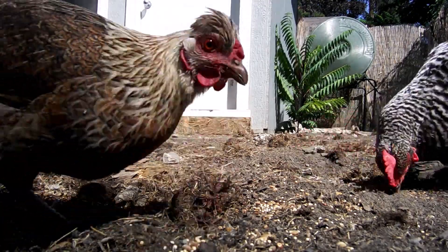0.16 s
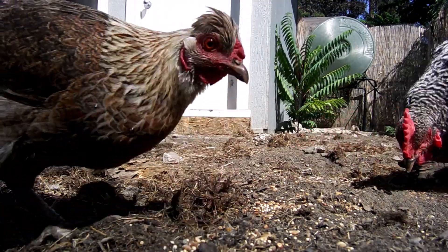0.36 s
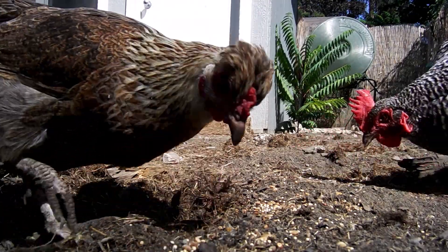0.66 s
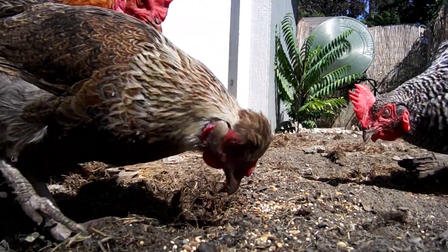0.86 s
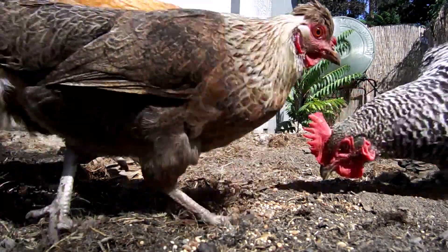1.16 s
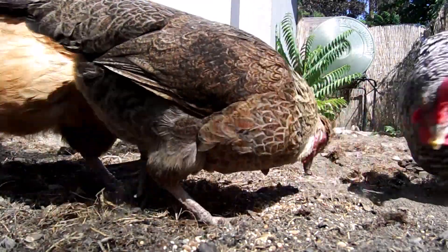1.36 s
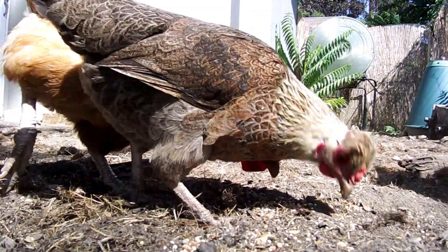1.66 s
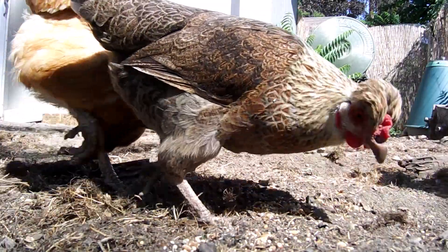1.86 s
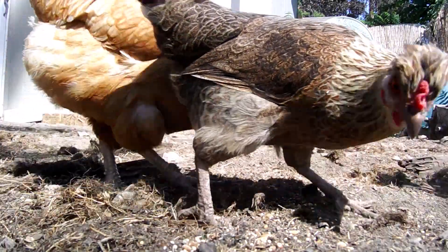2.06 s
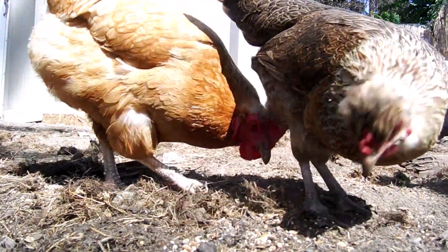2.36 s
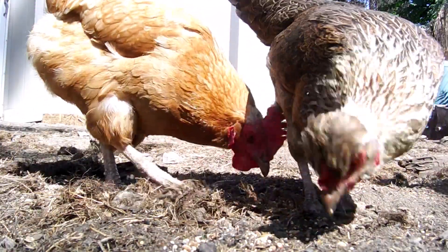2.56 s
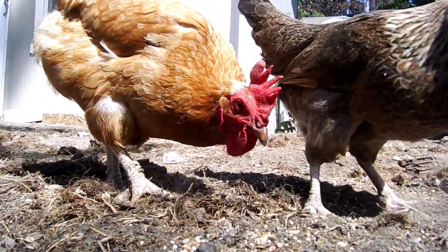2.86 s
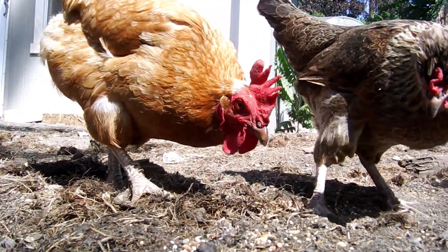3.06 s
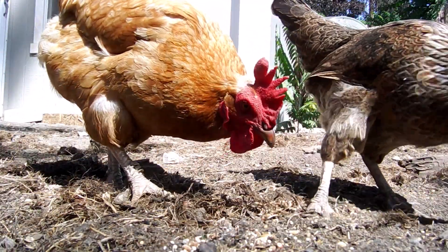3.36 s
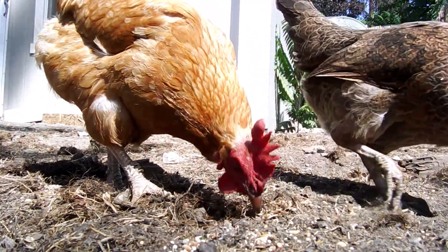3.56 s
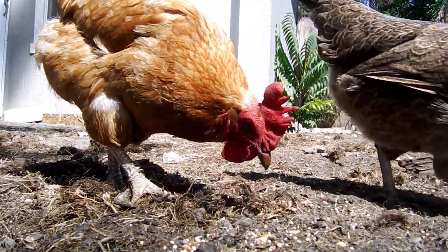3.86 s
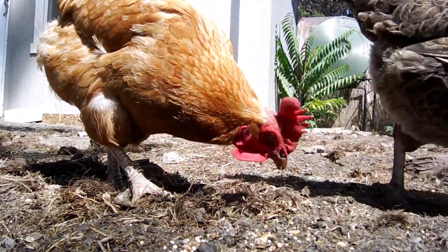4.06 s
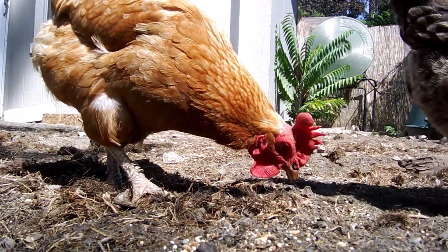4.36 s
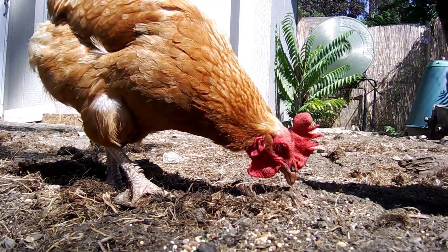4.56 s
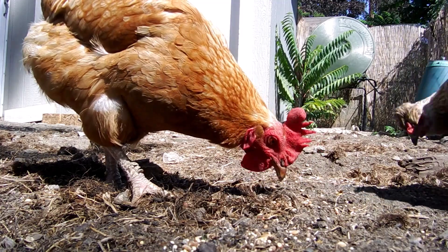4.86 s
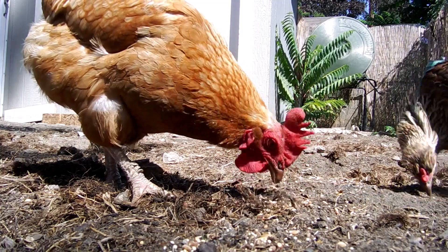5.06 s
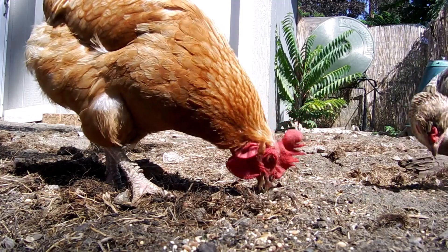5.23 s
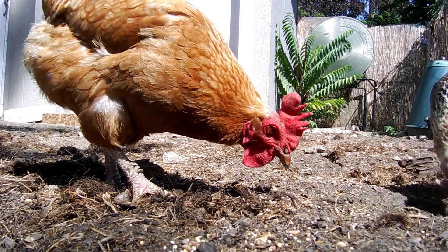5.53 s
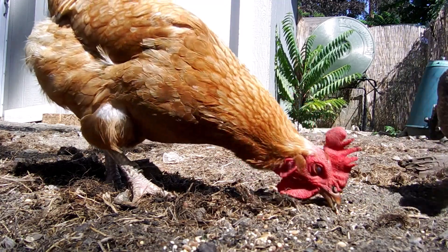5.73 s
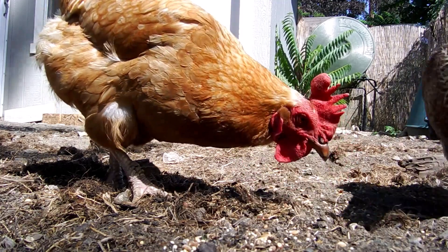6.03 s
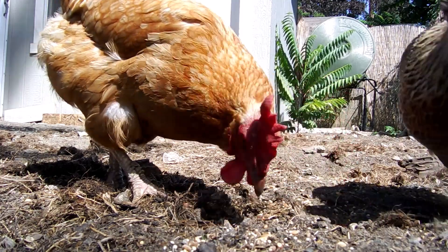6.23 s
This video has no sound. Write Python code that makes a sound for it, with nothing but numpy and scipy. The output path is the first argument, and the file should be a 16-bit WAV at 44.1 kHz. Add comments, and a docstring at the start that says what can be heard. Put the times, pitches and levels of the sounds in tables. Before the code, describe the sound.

Chickens feed very close to a microphone on bare dirt. Beaks tick and thud, feet scuff, dry litter snaps and a few seeds ping. After two seconds a hen gives short, rounded clucks and a brief raspy squawk; later another croons low in a string of breathy syllables. A small bird chirps faintly. Distant traffic, air and a weak hum lie beneath, in stereo with slight hiss.

```python
"""A hen clucks, pulses of her voice ringing the throat, and squawks in an even pulse train; another croons.
They feed on bare dirt in a small yard: beaks tap in filtered bursts, seeds ping as decaying sines,
feet scuff in clumped grains, litter snaps in bright noise; a small bird chirps gliding sines further off.
Far traffic and air (shaped noise) and a hum lie below.
Two microphone ports close by on the ground colour the sound differently."""
import sys
import numpy as np
from scipy import signal
from scipy.fft import rfft, irfft
from scipy.io import wavfile
from scipy.ndimage import uniform_filter1d

SR = 44100
rng = np.random.default_rng(int(sys.argv[2]) if len(sys.argv) > 2 else 0)


def field_ratio(decibels):
    """Amplitude ratio for a level in dB (20 dB per decade); scalars and array-likes work."""
    return 10 ** (np.asarray(decibels, dtype=float) / 20)


def wav_record(signal):
    """Record a signal, one row per channel, as 16-bit PCM in the file named by sys.argv[1]."""
    frames = np.transpose(np.atleast_2d(signal))
    bounded = np.clip(frames, -1, 1)
    # unit amplitude maps onto the largest positive 16-bit level
    quanta = np.round(bounded * 32767).astype(np.int16)
    wavfile.write(sys.argv[1], SR, quanta)


N = 281799

# Levels are source levels, ahead of placing, mixing and the port gains.
# far traffic and air: (time [s], level [dB])
TRAFFIC_LEVEL = [(0.0, -53.5), (0.25, -55.5), (0.6, -56), (1.5, -54), (2.3, -54.5), (3.5, -55.5),
                 (4.5, -55.5), (5.5, -55.5), (6.39, -55)]
# their relative spectrum: (frequency [Hz], density [dB per Hz])
TRAFFIC_SPECTRUM = [(25, -53), (60, -4), (120, 0), (300, -1.5), (900, -3), (1900, -5), (3000, -16),
                    (4500, -17.5), (6000, -26), (8000, -39), (16000, -19.5)]
# share of their power common to both ports: (frequency [Hz], share [0-1])
SHARED_POWER = [(60, 0.8), (150, 0.5), (350, 0.5), (1100, 0.51), (1600, 0.86), (2300, 0.32), (16000, 0.053)]
# wavering hum tones: (frequency [Hz], width of each of two stages [Hz], rms [dB])
HUM_TONES = [(73, 13, -80.5), (120.3, 7.2, -69), (1152.5, 45, -70.5)]
# feet and beaks stirring the dirt: (time [s], level [dB])
SCUFF_LEVEL = [(0.0, -64.5), (0.12, -79), (0.19, -59.5), (0.4, -63), (0.5, -72.5), (0.82, -63.5),
               (0.96, -74), (1.08, -65), (1.14, -54), (1.26, -58), (1.33, -55), (1.43, -63), (1.55, -59),
               (1.74, -58.5), (1.81, -66), (2.22, -61), (2.55, -65.5), (2.8, -60), (3.5, -67.5),
               (4.9, -72.5), (5.4, -64.5), (6.39, -66)]
# dry bits of litter snapping: (time [s], peak [dB])
LITTER_SNAPS = [(0.1464, -44), (0.3482, -41), (0.417, -46), (0.5807, -44.5), (0.79, -41), (0.958, -38),
                (1.105, -39), (1.5767, -34.5), (1.975, -43), (2.226, -37), (2.709, -43.5), (2.7816, -43)]
# beak on seed and dirt: (time [s], tick peak [dB], thud [Hz], thud peak [dB])
BEAK_TAPS = [(0.1888, -31.5, 1490, -40.5), (0.2166, -30.5, 1130, -39.5), (0.257, -43, 1000, -43.5),
             (0.264, -44, 840, -47), (0.6409, -42, 885, -40), (0.6648, -44, 1100, -53),
             (0.7192, -45, 1320, -45), (0.7904, -47, 1110, -55), (0.826, -44, 859, -57),
             (0.856, -38, 930, -42), (1.1345, -41, 1190, -44), (1.2329, -38, 1070, -51),
             (1.3398, -40, 1300, -49), (1.4512, -21, 1590, -50), (1.476, -41, 904, -49),
             (1.5454, -42, 1710, -46), (1.5747, -32, 1760, -45), (1.6262, -37, 1900, -36),
             (1.6527, -39, 1600, -48), (1.701, -39.5, 1230, -34.5), (1.8229, -49, 947, -42),
             (1.8822, -44.5, 1160, -50), (1.9027, -49, 850, -35), (1.9744, -47, 1530, -42.5),
             (2.2256, -32.5, 1710, -41), (2.545, -44, 970, -42), (2.7796, -44, 890, -55),
             (3.0101, -47, 1540, -64), (3.1567, -40, 795, -41.5), (3.1665, -42, 942, -44.5),
             (3.784, -43.5, 1326, -38), (4.4418, -40, 1510, -39), (4.4513, -51, 735, -35),
             (4.6402, -32, 1470, -28), (4.8191, -39, 1399, -43), (4.867, -42.5, 910, -43),
             (5.5908, -37, 1440, -40.5), (5.9495, -44, 1120, -43), (5.9752, -42, 1210, -36.5),
             (6.1627, -47, 1450, -50), (6.302, -67, 350, -45)]
# seeds on something hard: (time [s], level ahead of the soft onset [dB], mode [Hz], t60 [s])
SEED_PINGS = [(0.669, -52.5, 4130, 0.033), (0.7914, -35.5, 4130, 0.023), (0.824, -50, 4160, 0.074),
              (1.2336, -27.5, 4130, 0.02)]
# small bird, one table a note: (time [s], pitch [Hz], level [dB])
BIRD_NOTES = [
    [(1.983, 3240, -64), (1.995, 3120, -55), (2.022, 3080, -54)],
    [(2.028, 3470, -58), (2.04, 3760, -51), (2.057, 3430, -51), (2.064, 3160, -49), (2.072, 3310, -63),
     (2.1, 3000, -66)],
    [(3.203, 3250, -51), (3.209, 3710, -50), (3.216, 4570, -50), (3.235, 4390, -46), (3.25, 4450, -60),
     (3.265, 4000, -71)],
    [(3.237, 3280, -63), (3.246, 3470, -41), (3.256, 3900, -53)],
    [(3.26, 3000, -64), (3.278, 3280, -43), (3.287, 3620, -37.5), (3.293, 3000, -48), (3.305, 2640, -56),
     (3.335, 2640, -70)],
    [(3.272, 4200, -64), (3.281, 4250, -57), (3.292, 4250, -68)],
]
# slow single pulses before a cluck catches:
# (first pulse [s], gap [ms], peak [dB], loudest pulse [number from 0], edge drive re pulse [dB])
OPENING_PULSES = [(2.0952, 3.85, -26.5, .55, -26), (2.335, 4.56, -21.5, 1.45, -4),
                  (2.4914, 4.2, -19, 1.3, -4.5), (2.7325, 3.75, -18.5, 1.8, -33),
                  (3.72, 4.02, -24, .65, -34), (4.1277, 3.9, -29, 1.1, -35)]
# clucks, one table a call: (time [s], pitch [Hz], level [dB])
CLUCK_NOTES = [
    [(2.104, 718, -45), (2.117, 761, -36), (2.126, 735.4, -30), (2.145, 723, -31.5), (2.156, 699, -34.5),
     (2.164, 720, -58)],
    [(2.351, 652, -38), (2.362, 684, -29), (2.374, 704, -31), (2.397, 632, -37.5), (2.404, 615, -58)],
    [(2.5, 614.3, -33.5), (2.507, 633.5, -29), (2.513, 702.6, -27.5), (2.528, 737, -58)],
    [(2.744, 600, -44), (2.752, 550, -42), (2.761, 543, -37.5), (2.772, 570, -54)],
    [(3.728, 660, -46), (3.752, 760.7, -36), (3.77, 692.4, -36.5), (3.795, 665, -39.5), (3.822, 675, -70)],
    [(3.967, 746, -43), (3.973, 721.6, -35.5), (3.99, 682.5, -36.5), (4.01, 737.6, -39.5),
     (4.022, 698, -39.5), (4.032, 640, -40), (4.036, 610, -46)],
    [(4.132, 600, -32.5), (4.139, 610, -37.5), (4.16, 694, -47)],
]
# throat resonance met by the second partial:
# (frequency [Hz], level there re first partial [dB], loss off it [dB per 100 Hz])
CLUCK_THROAT = (1163, 0.55, 4.9)
# squawk, an even train of pulses: (time [s], rate [pulses/s], level [dB])
SQUAWK_PULSES = [
    [(2.797, 310, -45), (2.804, 330, -31.5), (2.81, 304, -21.5), (2.824, 261, -21.5), (2.837, 270, -22),
     (2.849, 289, -25), (2.858, 255, -25.5), (2.873, 254, -30.5), (2.885, 220, -29), (2.914, 235.2, -29),
     (2.929, 229, -25.5), (2.958, 224, -27), (2.968, 185, -37.5), (2.98, 230, -54)],
]
# lift of the beak resonance in the squawk: (time [s], lift [dB])
BEAK_LIFT = [(2.805, 7), (2.836, 4.5), (2.855, 2), (2.9, 3.5), (2.965, 8)]
# windpipe and beak resonances: (frequency [Hz], width [Hz], gain [dB])
THROAT_MODES = [(264, 110, -0.5), (748, 247, 8.5), (1194, 314, -8), (1900, 200, -31)]
# croon of the second hen, one table a syllable: (time [s], pitch [Hz], level [dB])
CROON_NOTES = [
    [(4.09, 350, -57), (4.112, 345.5, -55.5), (4.17, 362.4, -62), (4.26, 322.1, -59), (4.283, 345.2, -59),
     (4.312, 324.8, -57), (4.336, 396.6, -54), (4.36, 357.4, -59), (4.4, 355.2, -64)],
    [(4.405, 372, -57), (4.44, 381.4, -60), (4.485, 354, -52.5), (4.512, 423, -48.5), (4.538, 359.5, -53),
     (4.56, 298.4, -72)],
    [(4.595, 353.2, -58), (4.62, 336.5, -56.5), (4.655, 310, -52.5)],
    [(4.66, 335.7, -61), (4.69, 353.3, -53.5), (4.73, 322.4, -49.5), (4.772, 392.7, -51), (4.8, 327.8, -49),
     (4.82, 305.3, -62)],
    [(4.838, 317.8, -60), (4.863, 325.6, -49), (4.89, 302, -47.5), (4.905, 295, -76)],
    [(4.945, 330.5, -72), (4.96, 331, -55.5), (5.0, 289.5, -50.5), (5.018, 275, -77)],
    [(5.045, 350.6, -56), (5.065, 378.4, -49.5), (5.094, 327, -46.5), (5.116, 304.4, -80)],
]
# her throat resonance: columns as CLUCK_THROAT
CROON_THROAT = (680, 4.5, 11.0)
# microphone port resonances: (frequency [Hz], width [Hz], gain at each stage's centre [dB])
LEFT_PORT_MODES = [(660, 780, 1.5), (1100, 200, 0), (3250, 9000, -3), (3800, 380, -3.5), (6000, 2500, 1),
                   (6400, 1700, -5)]
RIGHT_PORT_MODES = [(1500, 560, 4), (4250, 410, 9.5), (5485, 460, 5.5), (7620, 990, -4)]
# cut out by the recorder, each in two stages: (frequency [Hz], width [Hz])
RECORDER_NOTCHES = [(2500, 145), (5000, 685), (7500, 105)]
# relative hiss spectrum: (frequency [Hz], density [dB])
HISS_SPECTRUM = [(100, 7), (5300, -28), (6900, -23), (8100, -12.5), (8700, 0), (12000, 2), (16000, 4.4)]


def rms_one(x):
    """Scale to rms 1."""
    return x / np.sqrt(np.mean(x ** 2) + 1e-20)


def in_time(tables, as_is):
    """Columns at every sample; those after the first as_is turn from dB to gain, shut between notes."""
    rows = np.concatenate(tables)
    t = np.arange(N) / SR
    is_open = sum((t >= note[0][0]) & (t < note[-1][0]) for note in tables)
    gate = uniform_filter1d(1. * is_open, size=90)
    columns = []
    for k, column in enumerate(rows[:, 1:].T):
        if k < as_is:
            columns.append(np.interp(t, rows[:, 0], column))
        else:
            columns.append(gate * np.interp(t, rows[:, 0], field_ratio(column)))
    return columns


def resonate(x, hz, width_hz):
    """Two-pole resonance, gain 1 on top."""
    r = np.exp(-np.pi * width_hz / SR)
    zeros = np.array([1, 0, -1]) * (1 - r * r) / 2
    poles = [1, -2 * r * np.cos(2 * np.pi * hz / SR), r * r]
    return signal.lfilter(zeros, poles, x + 1e-18)


def resonate_twice(x, hz, width_hz):
    """A steeper resonance, two equal stages."""
    return resonate(resonate(x, hz, width_hz), hz, width_hz)


def coloured(white, spectrum):
    """Noise given a spectrum, its dB interpolated over log frequency."""
    hz = np.maximum(np.fft.rfftfreq(N, 1 / SR), 1)
    table_hz, table_db = np.array(spectrum).T
    gain_db = np.interp(np.log(hz), np.log(table_hz), table_db)
    return irfft(rfft(white) * field_ratio(gain_db), N)


def drift(points_per_s):
    """Slow chance: normal points of spread 1, joined by lines."""
    points = int(N / SR * points_per_s) + 2
    values = rng.standard_normal(400)[:points]
    return np.interp(np.arange(N) / SR * points_per_s, np.arange(points), values)


def placed(x, lag, left_db=0):
    """Both ports; the left hears it lag samples later, left_db louder."""
    left = np.interp(np.arange(N) - lag, np.arange(N), x)
    return np.array([field_ratio(left_db) * left, x])


def throat(pulses):
    """Resonances of windpipe and beak, in parallel with alternating signs."""
    return sum((-1) ** k * field_ratio(db) * resonate(pulses, hz, width_hz)
               for k, (hz, width_hz, db) in enumerate(THROAT_MODES))


def yard(patchy_db):
    """Far traffic and air, alike on both sides only in part; the hum comes from one place."""
    mid, left, right = rng.standard_normal((3, N))
    shares = [(hz, np.clip(share, .01, .99)) for hz, share in SHARED_POWER]
    shared = coloured(mid, [(hz, 10 * np.log10(c)) for hz, c in shares])
    own = coloured(np.array([left, right]), [(hz, 10 * np.log10(1 - c)) for hz, c in shares])
    level, = in_time([TRAFFIC_LEVEL], 0)
    noise = rms_one(coloured(placed(shared, lag=5.4) + own, TRAFFIC_SPECTRUM))
    air = level * field_ratio(patchy_db * drift(5.96)) * noise
    hum = sum(field_ratio(db) * rms_one(resonate_twice(rng.standard_normal(N), hz, width_hz))
              for hz, width_hz, db in HUM_TONES)
    # steady-pitched core of the hum
    hum += field_ratio(-64 + 1.0 * drift(3.9)) * np.sin(2 * np.pi * 119.9 * np.arange(N) / SR)
    return air + placed(hum, lag=2.2)


def scuff(grains_per_s, spread_db, clump_db):
    """Dense uneven grains of dirt in clumps, each ringing briefly in one of ten bands."""
    level, = in_time([SCUFF_LEVEL], 0)
    sizes = field_ratio(spread_db * np.minimum(rng.exponential(1, N), 4)) * rng.choice([-1, 1], N)
    grains = sizes * (rng.random(N) < grains_per_s / SR) * field_ratio(clump_db * drift(50))
    band = rng.integers(0, 10, N)
    rings = np.zeros(N)
    for k, hz in enumerate(np.geomspace(2800, 13000, 10)):
        rings += field_ratio(-2.4 * k) * resonate_twice(grains * (band == k), hz, hz / 1.95)
    return level * rms_one(rings)


def snaps():
    """Litter snaps: short decaying bursts of noise through a broad treble resonance."""
    out, t = np.zeros(N), np.arange(2000) / SR
    fall_20db_ms = 8.1
    for (s, peak_db), grit in zip(LITTER_SNAPS, rng.standard_normal((len(LITTER_SNAPS), 2000))):
        start = round(s * SR)
        burst = resonate(grit * field_ratio(-20 * t * 1000 / fall_20db_ms), 6700, 7100)
        out[start:start + 2000] += field_ratio(peak_db) * burst / np.abs(burst).max()
    return out


def pecks():
    """A tick, a thud and a crumble of dirt that dies within milliseconds, shorter after a harder tick."""
    out, t = np.zeros(N + 2000), np.arange(2000) / SR
    grits = rng.standard_normal((len(BEAK_TAPS), 2000))
    for (s, tick_db, thud_hz, thud_db), grit in zip(BEAK_TAPS, grits):
        start = round(s * SR)
        # time to lose 20 dB: 7.4 ms for a -41.5 dB tick, halved per 8 dB
        crumble_ms = 7.4 * 2 ** (-(max(tick_db, -44) + 41.5) / 8)
        burst = (grit + 1.0 * (t == 0)) * field_ratio(-20 * t * 1000 / crumble_ms)
        tick = resonate_twice(burst, 3580, 2400)
        tick += 0.1 * resonate(burst, 7500, 8600)   # treble snap of the tick
        thud = resonate_twice(burst, thud_hz, 630)
        for part, peak_db in [(tick, tick_db), (thud, thud_db)]:
            out[start:start + 2000] += field_ratio(peak_db) * part / np.abs(part).max()
    return out[:N]


def pings():
    """Seeds on something hard: one clean decaying mode, struck softly."""
    out, t = np.zeros(N), np.arange(2000) / SR
    for s, level_db, hz, t60_s in SEED_PINGS:
        start = round(s * SR)
        onset = 1 - np.exp(-t / 0.00018)
        out[start:start + 2000] += field_ratio(level_db - 60 * t / t60_s) * onset * np.sin(2 * np.pi * hz * t)
    return out


def bird():
    """Gliding, slightly hoarse sines with a smear of echoes off fence and shed."""
    out = np.zeros(N)
    for chirp in BIRD_NOTES:
        pitch_hz, level = in_time([chirp], 1)
        out += level * np.sin(2 * np.pi * np.cumsum(pitch_hz) / SR)
    out *= 1 + 0.079 * rms_one(resonate(rng.standard_normal(N), 120, 230))
    echoes = rng.standard_normal(4000) * np.exp(-np.arange(4000) / SR / 0.032)
    return out + field_ratio(-31) * signal.fftconvolve(out, echoes)[:N]


def openers():
    """Each pulse rings the throat once; a sharp edge reaches the treble, with a puff of air."""
    first_s, gap_ms, top_db, loudest, edge_db = np.transpose(OPENING_PULSES)[:, :, None]
    number = np.arange(4)
    at = np.round((first_s + number * gap_ms / 1000) * SR).astype(int)
    peak_db = top_db - 10 * (number - loudest) ** 2   # 10 dB down one gap from the loudest
    pulses, edges = np.zeros((2, N))
    pulses[at] = -field_ratio(peak_db)
    edges[at] = -field_ratio(peak_db + edge_db)
    puff = signal.lfilter([1], [1, -np.exp(-1 / (0.0046 * SR))], edges)   # time constant 4.6 ms
    edges += 0.2 * rng.standard_normal(N) * puff
    soften = signal.butter(2, 1800, fs=SR)
    unit = signal.lfilter(*soften, throat(np.eye(1, 400)[0]))
    rung = signal.lfilter(*soften, throat(pulses)) / np.abs(unit).max()
    return rung + 6.3 * resonate_twice(edges, 3760, 1330)


def note(tables, second_at, third_db, jitter, breath):
    """Six partials: the upper ones follow pitch and level by rule; breath adds flutter and hoarseness."""
    pitch_hz, first = in_time(tables, 1)
    throat_hz, top_db, lost_db = second_at
    second = first * field_ratio(top_db - lost_db * np.abs(2 * pitch_hz - throat_hz) / 100)
    # fifth and sixth: -57.5 dB at note level -29 dB, 2.5 dB more per dB
    open_beak = field_ratio(-57.5) * (first / field_ratio(-29)) ** 2.5
    turn = 2 * np.pi * np.cumsum(pitch_hz * (1 + jitter * drift(60))) / SR
    tone = first * np.sin(turn) + second * np.sin(2 * turn)
    tone += second * field_ratio(third_db) * (np.sin(3 * turn) + .5 * np.sin(4 * turn))
    tone += open_beak * (np.sin(5 * turn) + np.sin(6 * turn))
    flutter = 1 + breath * rms_one(resonate(rng.standard_normal(N), 110, 93))
    # air rushing through the throat
    hoarse = first * 2.2 * breath * rms_one(resonate_twice(rng.standard_normal(N), 720, 450))
    return np.sqrt(2) * flutter * tone + hoarse


def clucks():
    """Near-pure gliding notes, with little flutter and little breath."""
    return note(CLUCK_NOTES, CLUCK_THROAT, third_db=-19.5, jitter=0.002, breath=0.037)


def squawk(soft_db, rasp_db):
    """Rounded pulses and a little rasp through the throat, evened in level, then shaped by effort."""
    rate_hz, effort = in_time(SQUAWK_PULSES, 1)
    beak = field_ratio(np.interp(np.arange(N) / SR, *np.transpose(BEAK_LIFT)))
    # the pulses come a little unevenly
    turn = 2 * np.pi * np.cumsum(rate_hz * (1 + .004 * drift(55))) / SR
    # weaker pulses are rounder: 3.5 dB per dB
    soft_db = soft_db - 3.5 * 20 * np.log10(np.clip(effort / effort.max(), .2, 1))
    pulses = -sum(field_ratio(-soft_db * (k / 8) ** 2) * np.cos(k * turn) for k in range(1, 16))
    rasp = field_ratio(rasp_db) * rng.standard_normal(N) * (1 + np.cos(turn))
    voice = throat(pulses + rasp)
    voice += (beak - 1) * resonate(voice, 930, 390)
    return effort * voice / np.sqrt(uniform_filter1d(voice ** 2, size=700) + 1e-12)


def croon():
    """Low notes of the second hen, unsteady and breathy."""
    return note(CROON_NOTES, CROON_THROAT, third_db=-13., jitter=.018, breath=.33)


def scene():
    """All sources at the two ports."""
    early = np.arange(N) < 3.4 * SR   # after this the clucking hen has walked off to the right
    hen = clucks() + squawk(soft_db=9.5, rasp_db=-6.0) + openers()
    voices = placed(hen * early, lag=2.8, left_db=-3.0)
    voices += placed(hen * ~early + croon(), lag=4.3, left_db=-4.5)
    dirt = np.array([scuff(grains_per_s=2000, spread_db=3.2, clump_db=3.2) for port in "LR"])
    small_sounds = placed(pecks() + snaps() + pings() + bird(), lag=4.0, left_db=-5.0)
    return field_ratio(1.13) * voices + small_sounds + dirt + yard(patchy_db=0.38)


def top_cut(x):
    """Nothing passes above the cut-off."""
    return signal.sosfilt(signal.butter(12, 16530, fs=SR, output="sos"), x)


def record(dry):
    """Each port has its resonances and gain; hiss joins, then three notches and the top are cut."""
    ports = []
    for x, modes, gain_db in zip(dry, [LEFT_PORT_MODES, RIGHT_PORT_MODES], [-1.5, 2.2]):
        for hz, width_hz, db in modes:
            x = x + (field_ratio(db) - 1) * resonate(x, hz, width_hz)
        ports.append(field_ratio(gain_db) * x)
    hiss = rms_one(coloured(rng.standard_normal((2, N)), HISS_SPECTRUM))
    mix = np.array(ports) + field_ratio([[-62.5], [-61.]]) * hiss
    for hz, width_hz in RECORDER_NOTCHES + RECORDER_NOTCHES:
        mix = mix - resonate(mix, hz, width_hz)
    low_pass = signal.ellip(12, .3, 60, 15720, fs=SR, output="sos")
    mix = signal.sosfilt(low_pass, mix)
    return top_cut(mix)


dry = scene()
out = record(dry)
wav_record(out)
```